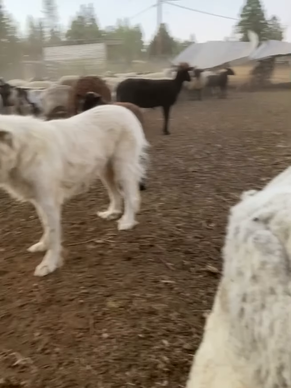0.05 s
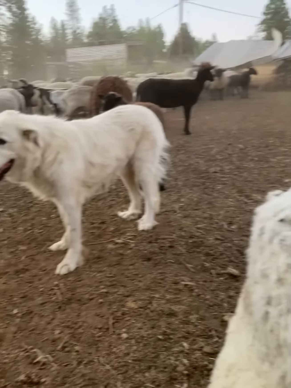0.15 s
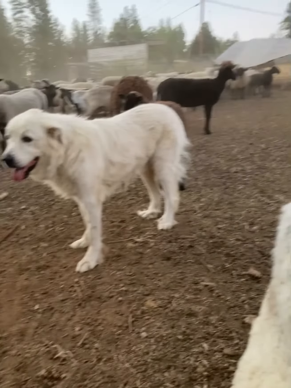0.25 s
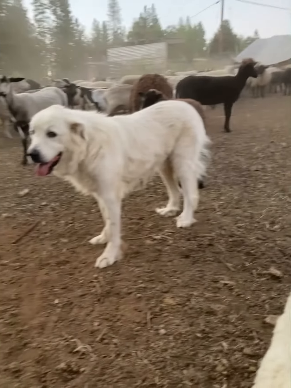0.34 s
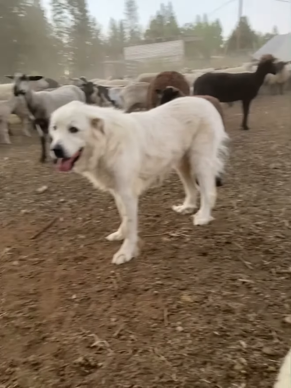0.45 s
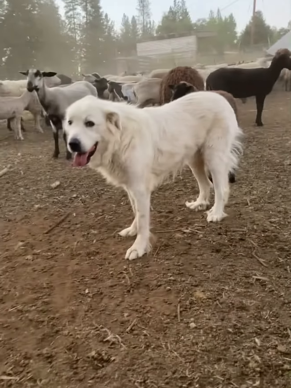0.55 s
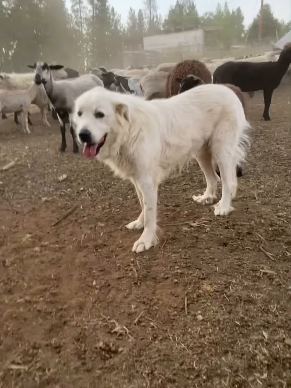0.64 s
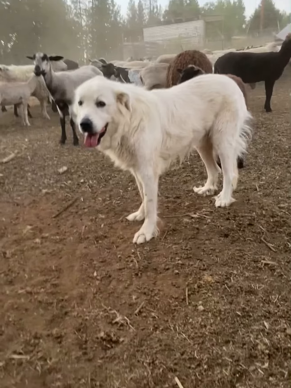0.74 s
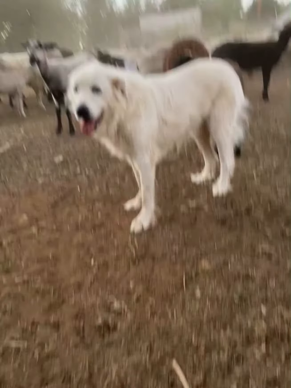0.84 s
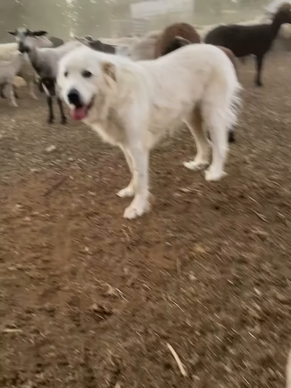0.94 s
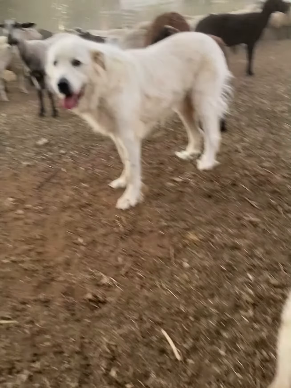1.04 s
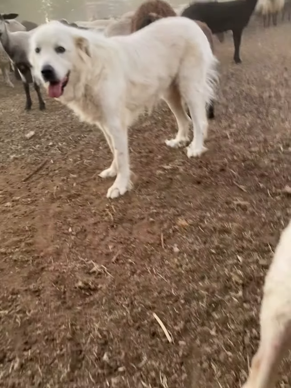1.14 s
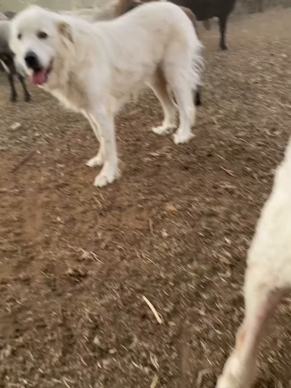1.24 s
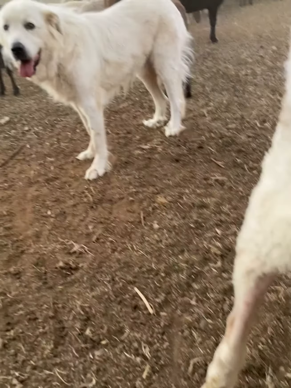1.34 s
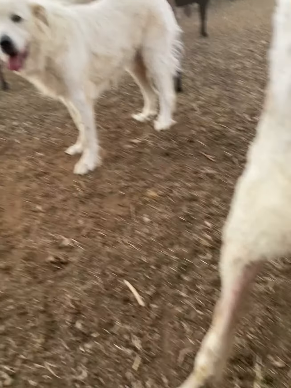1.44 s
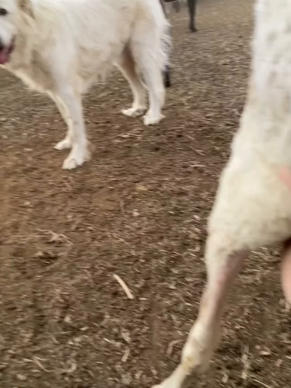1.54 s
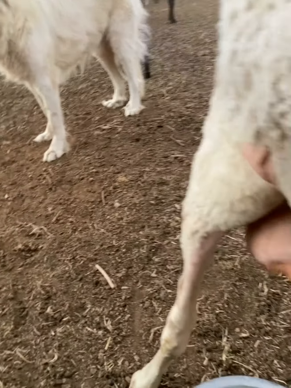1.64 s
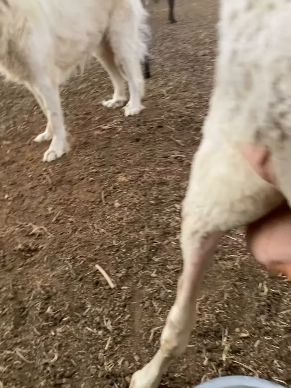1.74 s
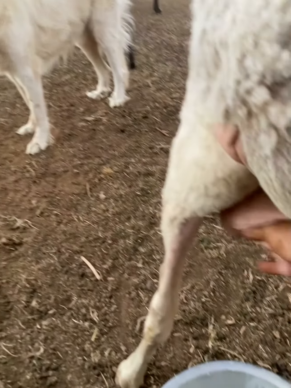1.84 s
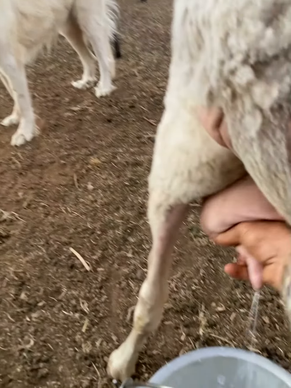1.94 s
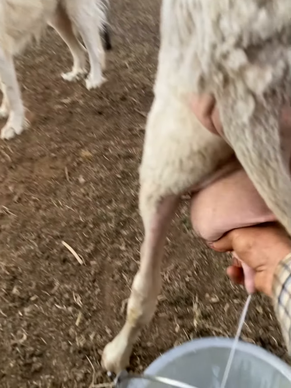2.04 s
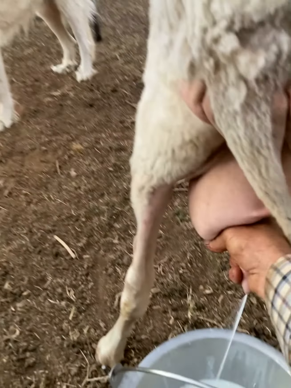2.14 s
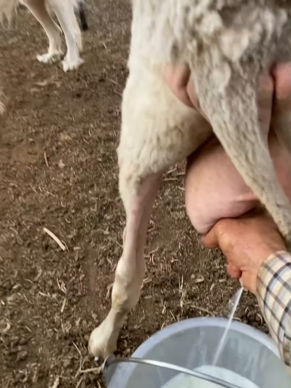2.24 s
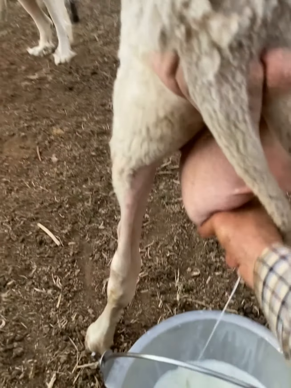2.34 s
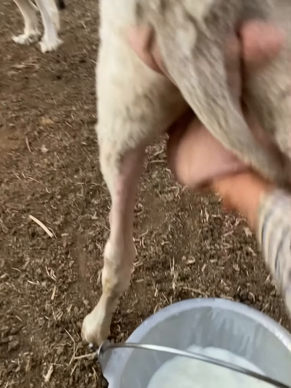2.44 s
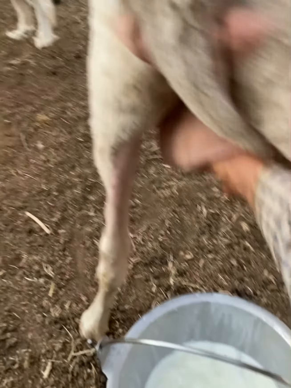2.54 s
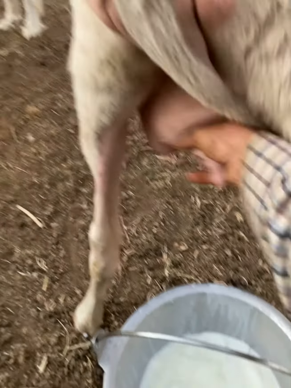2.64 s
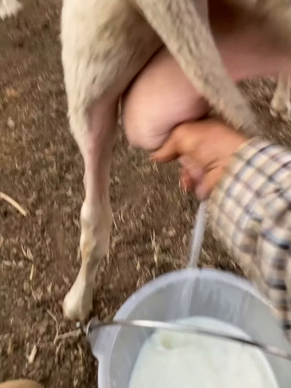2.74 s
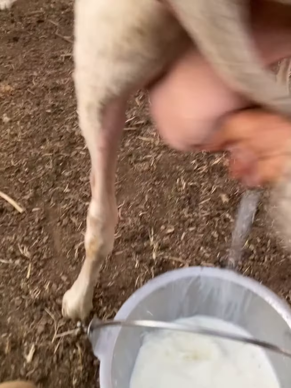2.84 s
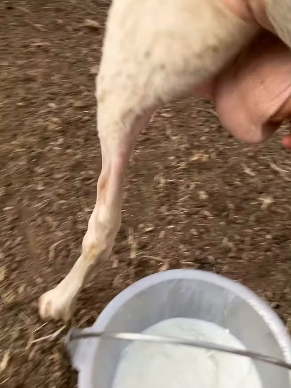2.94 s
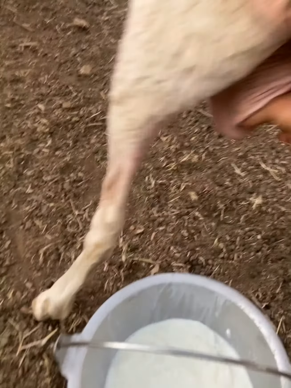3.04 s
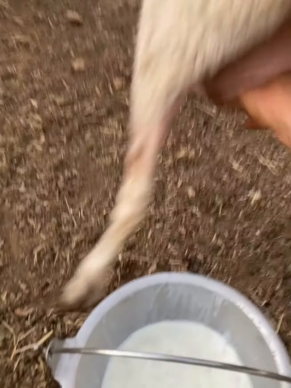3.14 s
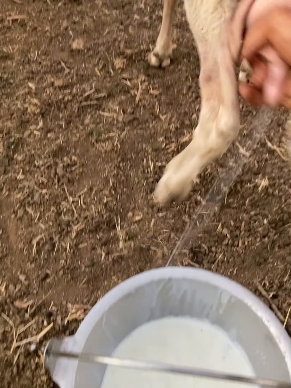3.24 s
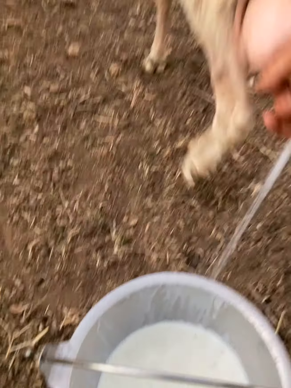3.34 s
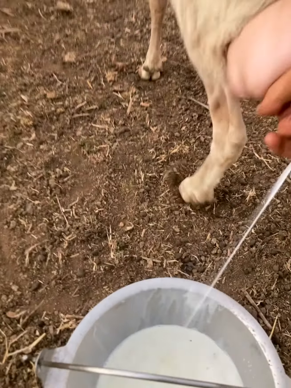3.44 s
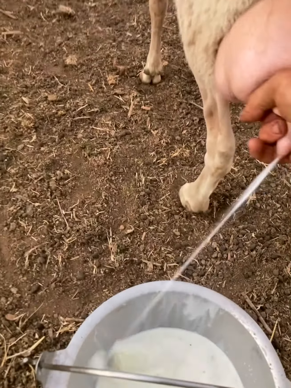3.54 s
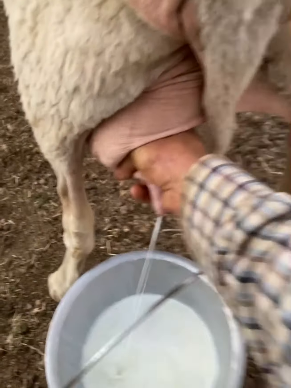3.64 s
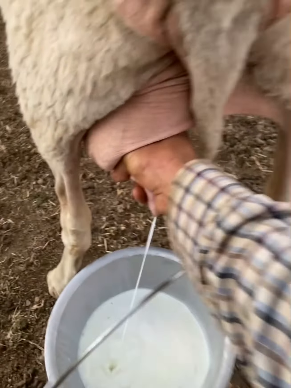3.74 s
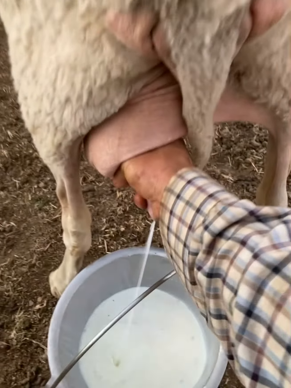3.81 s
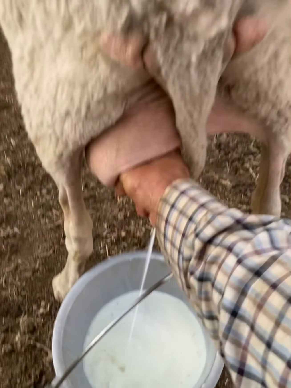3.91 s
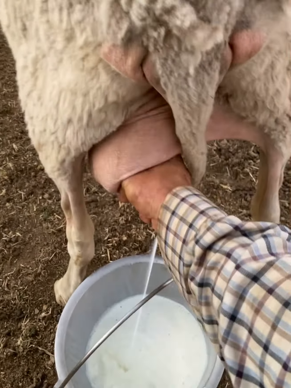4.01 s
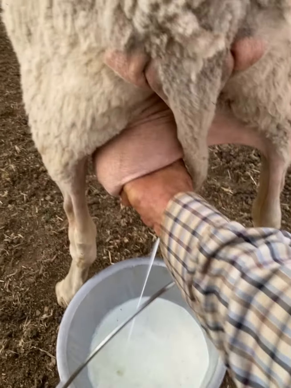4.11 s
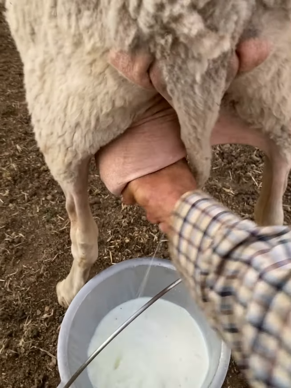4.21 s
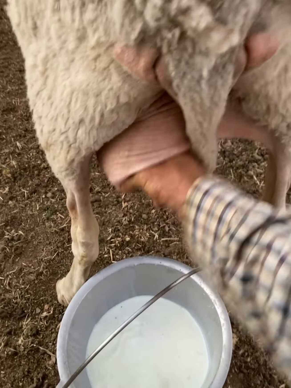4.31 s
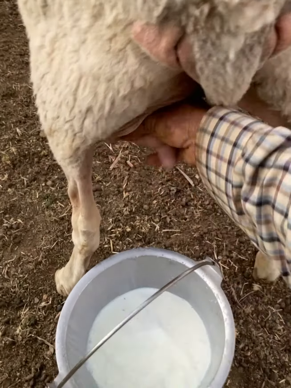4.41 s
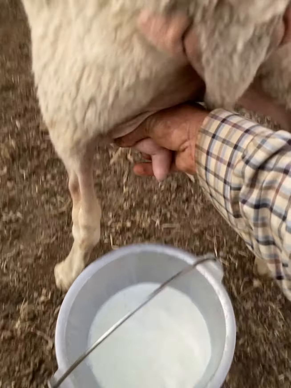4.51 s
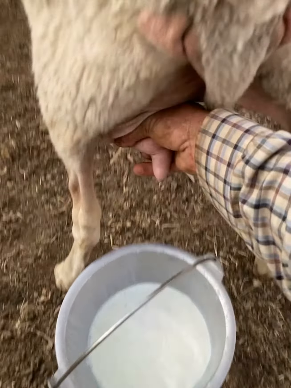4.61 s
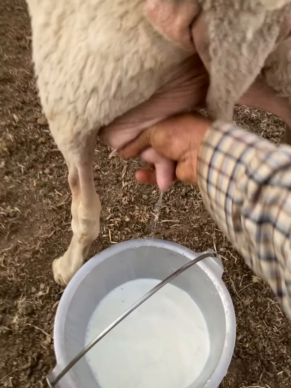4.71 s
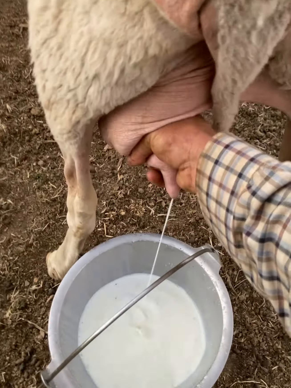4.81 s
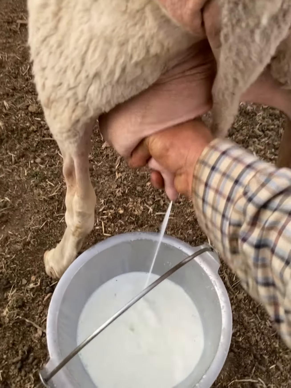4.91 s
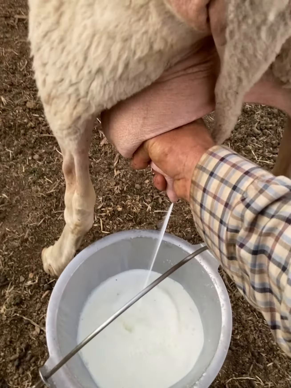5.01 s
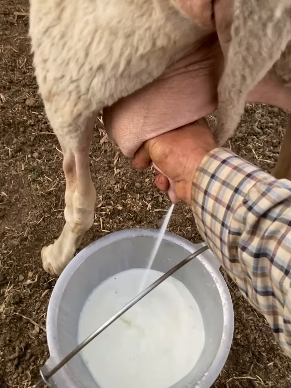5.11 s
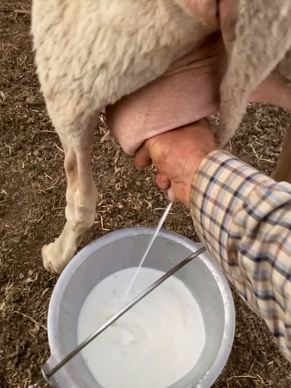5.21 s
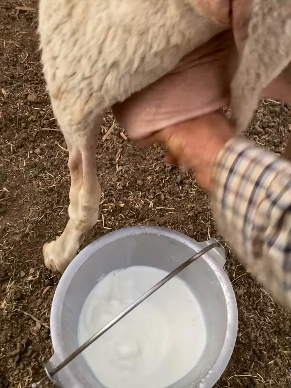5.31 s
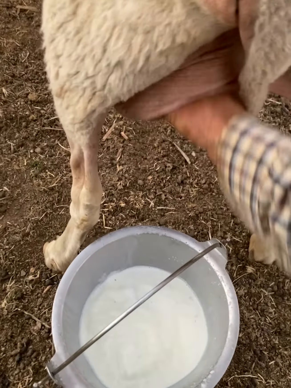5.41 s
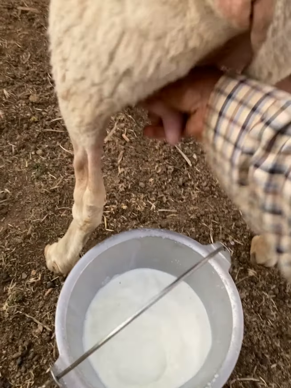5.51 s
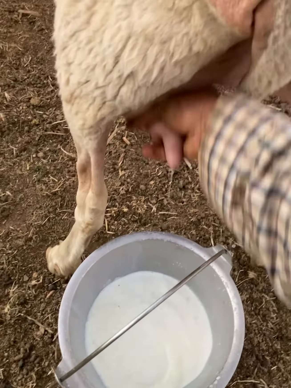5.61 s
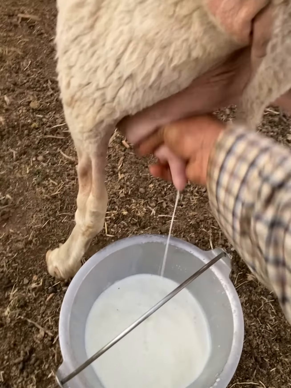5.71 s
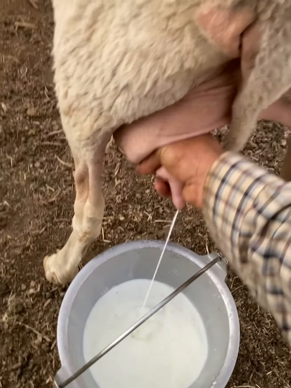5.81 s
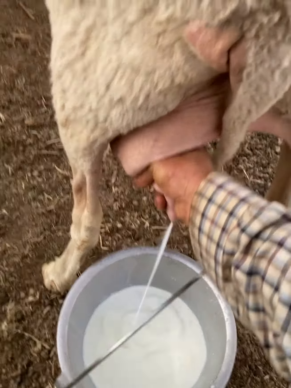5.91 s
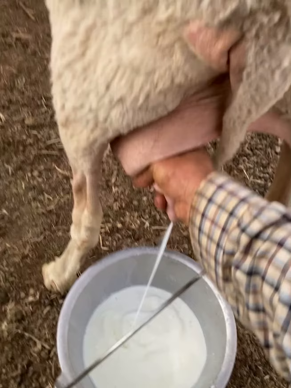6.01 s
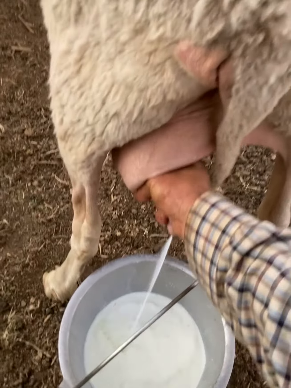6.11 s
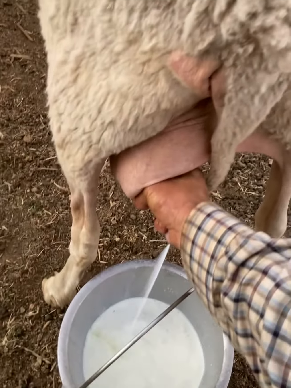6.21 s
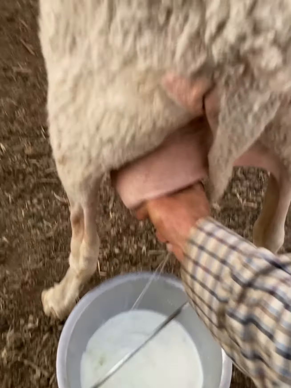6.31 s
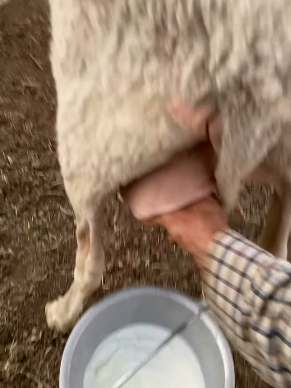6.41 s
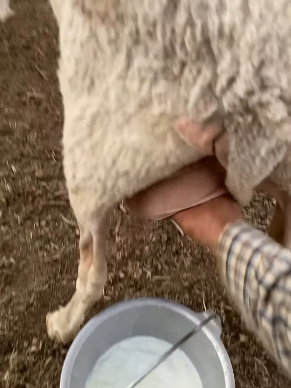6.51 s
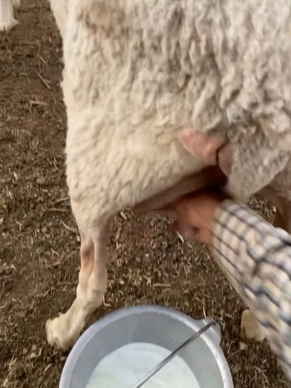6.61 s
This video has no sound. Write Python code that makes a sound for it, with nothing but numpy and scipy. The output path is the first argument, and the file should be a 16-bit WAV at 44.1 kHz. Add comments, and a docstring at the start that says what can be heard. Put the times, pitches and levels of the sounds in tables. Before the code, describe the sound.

Close hand milking: crisp sprays of milk dig into froth and gurgle, quick early on, then longer and slower over faint outdoor rumble.

```python
"""Hand milking into a metal pail

A ewe is milked in a quiet outdoor pen, close to the microphone. Each squirt spatters on the froth, digs
into the milk and gurgles: swarms of tiny bubbles, coloured by the pail's wall echoes and air resonances.
Single plops and sharp drops stand out. Between the early squirts the pail is shifted and knocked, and a
hoof scuffs the dirt: decaying body tones and gritty clicks. Behind lie shaped noise, as low rumble and
fine hiss, and the prickle of settling froth."""
import sys
import numpy as np
from scipy import signal
from scipy.fft import rfft, irfft
from scipy.io import wavfile
from scipy.ndimage import map_coordinates

SR = 44100
rng = np.random.default_rng(int(sys.argv[2]) if len(sys.argv) > 2 else 0)


def to_wav(sig):
    """Store sig (one row per channel, or 1-D mono) as 16-bit WAV at the path in sys.argv[1].

    Samples outside -1..1 are clipped; the rate is SR.
    """
    pcm = np.clip(np.atleast_2d(sig), -1, 1) * 32767
    pcm = np.round(pcm).astype(np.int16)
    wavfile.write(sys.argv[1], SR, pcm.T)  # frames by channels


N = 293706  # length in samples

# Resonances of the air in the pail, lowest first: (frequency [Hz], width [Hz], level [dB])
CAVITY = [(550.5, 48, -2), (705, 260, -1), (1228, 86, 5), (2045, 190, 0), (2880, 750, -8.5),
          (3580, 560, -9.5)]


def squirt(length, attack, bore, crest, release, fizz_db, swell_db, splash_db, gurgle_db, churn_db):
    """One spurt: the jet breaks into uneven slugs that whip up small, middling and large bubbles."""
    tail_s = 0.25
    crest_width = 0.3  # share of the spurt over which the grip is hardest
    t = np.arange(0, length + tail_s, 1 / SR)
    n = len(t)
    after = np.maximum(t - length, 0)

    # the teat opens, the grip swells to its crest, and the flow dies when the hand lets go
    flow = (1 - np.exp(-t / attack)) * gain_of(-60 * after / release)
    slack_db = swell_db * (1 - np.exp(-((t - crest) / (crest_width * length)) ** 2))

    # a weak jet sputters, a full one runs evenly
    weakness_db = slack_db - 20 * np.log10(flow + 1e-9)
    sputter_db = 1.25 * np.clip(0.5 + 0.78 * weakness_db, 1, 2.4)
    sputter = gain_of(sputter_db * wander(n, 320))

    # mid-spurt the jet digs deepest: the gurgle sinks in pitch and the splash brightens
    progress = np.clip((t - bore) / (length + release / 2 - bore), 0, 1)
    depth = np.sin(np.pi * progress ** 1.16) ** 2

    # a harder jet makes finer spray: dB per octave for each dB of fizz above the neutral level
    brighten, neutral_db = 0.1, -35
    fizz_tilt_db = brighten * (fizz_db - slack_db - neutral_db)
    fizz = sputter * swarm(n, 4750, 14840, per_s=15000, spread_db=7.0, cycles=1.2, glide=0.035,
                           tilt_db=fizz_tilt_db)
    splash = sputter * swarm(n, 946, 4520, per_s=2400, spread_db=1.5, cycles=2.18, glide=0.027,
                             tilt_db=1.6 * (depth - 1.56))
    gurgle = swarm(n, 211.0, 808, per_s=700, spread_db=1.0, cycles=2.13, glide=0.0052,
                   tilt_db=6.1 * (0.91 - depth))
    fizz, splash, gurgle = (evened(pail(x)) for x in (near_wall(fizz), splash, gurgle))

    # the hollow caves in and reopens at random; level against the splash
    collapses_per_s, collapse_db = 11, -4.5
    for s in t[rng.random(n) < collapses_per_s / SR]:
        add(splash, s, plunge(collapse_db, count=8))

    # the milk churns on after the jet stops, heard in the pail's lowest resonance
    churn_t60_s = 0.47
    lowest_hz, lowest_width_hz = CAVITY[0][:2]
    churn = evened(ring(gurgle, lowest_hz, lowest_width_hz)) * (1 - flow) * (after > 0)
    churn = churn * gain_of(churn_db - 60 * after / churn_t60_s)

    # the splash builds as the jet nears the milk under the froth
    splash_early = 0.46  # share of the splash heard before that
    splash_lead_s, splash_open_s = 0.0073, 0.015
    reach = opening(t - bore + splash_lead_s, splash_open_s)
    splash = splash * (splash_early + (1 - splash_early) * reach)

    # the gurgle starts once the hollow is open
    gurgle_lag_s, gurgle_open_s = 0.0079, 0.011
    gurgle = gurgle * opening(t - bore - gurgle_lag_s, gurgle_open_s)

    splash_swell = 0.53  # share of the swell that the splash follows
    gurgle_sink_db = 2  # large bubbles are muffled while the jet digs deepest
    jet = fizz * gain_of(fizz_db - slack_db)
    jet = jet + splash * gain_of(splash_db - splash_swell * slack_db)
    jet = jet + gurgle * gain_of(gurgle_db - gurgle_sink_db * depth)
    return flow * jet + churn


def opening(t, rise_s):
    """A soft step from 0 to 1 around t = 0."""
    return 0.5 + 0.5 * np.tanh(t / (2 * rise_s))


def plunge(db, first_hz=3400, last_hz=1150, count=22):
    """As the hollow deepens it traps ever larger bubbles, so the splash falls in pitch."""
    open_s = 0.04  # time for the hollow to open
    n = int(open_s * SR)
    out = np.zeros(n + 2048)
    for k, (late, size, loud) in enumerate(rng.uniform(-0.924, 1, (count, 3))):
        hz = first_hz * (last_hz / first_hz) ** (k / count) * 1.67 ** size
        start = open_s * abs(k + late) / count
        add(out, start, gain_of(0.44 * loud) * bubble(hz, 2.0, 0.03))
    out = pail(out)
    return gain_of(db) * out / out[:n].std()


def swarm(n, low_hz, high_hz, per_s, spread_db, cycles, glide, tilt_db=0, count=40):
    """Bubbles of many sizes, born at random; like sizes cloud together; tilt_db per octave favours small."""
    # weight of the bubbles by pitch: (frequency [Hz], level [dB per Hz])
    spray = [(76, -46), (130, 0), (268, 5.5), (369, 2), (563, 2.5), (1030, -10.5), (1180, -10.5),
             (1700, -6.5), (2080, -8), (2340, -6), (3570, -2.5), (4280, -5), (11700, -6.5), (14600, -4),
             (15800, 24)]
    middle_hz = np.sqrt(low_hz * high_hz)
    out = np.zeros(n)
    for sizes in np.geomspace(low_hz, high_hz, count).reshape(-1, 5):
        octaves = np.log2(sizes.mean() / middle_hz)
        cloud = gain_of(1.94 * wander(n, 70) + tilt_db * octaves)
        for hz in sizes:
            one = bubble(hz, cycles, glide)
            weight = gain_of(read(spray, hz)) * np.sqrt(hz) / np.linalg.norm(one)
            births = cloud * clicks(n, per_s / count, spread_db)
            out += weight * np.convolve(births, one)[:n]
    return out


def bubble(hz, cycles, glide):
    """A bubble swells, peaks after the given cycles and dies away while its pitch drifts."""
    u = np.arange(0, 7, hz / (cycles * SR))  # time, 1 at the peak
    swell = (u * np.exp(1 - u)) ** 2
    return swell * np.sin(2 * np.pi * cycles * (u + glide * u ** 2 / 2))


def pops(rows, cycles, glide, smack_db, spatter_db):
    """Single plops or drops: the smack of the impact, the ring of the trapped air and a brief spatter."""
    out = np.zeros(N)
    t = np.arange(2048) / SR
    for s, db, hz in rows:
        plop = bubble(hz, cycles, glide)
        smack = bubble(min(2.36 * hz, SR / 3), 0.69, 0)
        add(plop, 0, gain_of(smack_db) * smack)
        spatter = clicks(len(t), 1600, 1.2) * np.exp(-t / 0.0021) * (t > 0.001)
        blow = (t == 0) + gain_of(spatter_db) * spatter / np.linalg.norm(spatter)
        sound = pail(signal.fftconvolve(blow, plop))
        add(out, s, gain_of(db) * sound / abs(sound).max())
    return out


def near_wall(x, delay_s=0.000487, sway=0.26):
    """The nearest wall returns the spray at once; as the jet moves, the hollows of that echo slide."""
    delay = SR * delay_s * np.exp(sway * wander(len(x), 6.63))  # in samples
    echo = map_coordinates(x, [np.arange(len(x)) - delay])
    return x + gain_of(-10) * echo


def pail(x, sway_s=0.0498):
    """Sound made inside the pail: wall echoes that shift as the jet sways, and fixed air resonances."""
    treble = signal.sosfilt(signal.butter(2, 1500, "high", fs=SR, output="sos"), x)
    spot = np.arange(len(x)) / (sway_s * SR)
    out = x + sum(gain_of(db) * ring(x, hz, width) for hz, width, db in CAVITY)
    for k in range(4):
        share = np.maximum(np.cos(np.pi / 2 * (spot - k)), 0)
        out = out + signal.fftconvolve(treble * share, walls())[:len(x)]
    return out


def walls():
    """The quick echoes between the pail's walls, for one spot on the milk."""
    t60_s, first_s, echo_db = 0.022, 0.0006, -6.5
    t = np.arange(2048) / SR
    taps = rng.standard_normal(len(t)) * (t > first_s) * gain_of(-60 * t / t60_s)
    return gain_of(echo_db) * taps / np.linalg.norm(taps)


def ring(x, hz, width):
    """A resonance of gain 1: a one-pole filter turning at hz, narrower when it rings longer."""
    r = np.exp(-np.pi * width / SR)
    return 2 * signal.lfilter([1 - r], [1, -r * np.exp(2j * np.pi * hz / SR)], x).real


def handling():
    """The pail rings dully when it is knocked, and judders as grit scrapes under it."""
    # knocks on the pail: (time [s], peak level [dB], level of the grit under its foot [dB])
    knocks = [(1.178, -35, -73), (1.922, -36.5, -53), (2.682, -38.5, -68), (3.008, -26, -35.5)]
    # the pail or a hoof scrapes over dirt:
    # (start [s], length [s], time to the hardest push [s], grit level [dB], judder level [dB])
    scrapes = [(1.641, 0.25, .18, -46, -42.5), (3.11, 0.075, 0.027, -51, -59)]
    # tones of the filled pail when knocked or dragged: (frequency [Hz], level [dB], t60 [s])
    body_tones = [(172.6, 0, 0.066), (219.4, 11.5, 0.036), (290, 2, 0.054)]
    # colour of the grit: (frequency [Hz], level [dB per Hz])
    grit_colour = [(300, -18), (900, -8), (1400, -0.5), (2200, 1), (3200, -5.5), (5000, -3), (9000, -6.5),
                   (16000, -5)]

    out = np.zeros(N)
    t = np.arange(8192) / SR
    body = sum(gain_of(db - 60 * t / t60) * np.sin(2 * np.pi * hz * t) for hz, db, t60 in body_tones)
    body = body * (1 - np.exp(-t / 0.011))
    for s, db, grit_db in knocks:
        add(out, s, gain_of(db) * body / abs(body).max())
        crunch = coloured(rng.standard_normal(len(t)), grit_colour) * np.exp(-((t - 0.006) / 0.0046) ** 2)
        add(out, s - 0.01, gain_of(grit_db) * crunch)  # the grit gives way just before the pail lands

    grit_swell_db, judder_swell_db = 8.5, 20  # the judder needs a harder push than the grit
    for start, length, crest, grit_db, judder_db in scrapes:
        t = np.arange(0, length, 1 / SR)
        slack = np.interp(t, [0, crest, length], [1, 0, 1])
        slips = clicks(len(t), 4100, 1.8)
        grit = gain_of(grit_db - grit_swell_db * slack) * coloured(slips, grit_colour)
        judder = evened(signal.fftconvolve(slips, body)[:len(t)])
        judder = gain_of(judder_db - judder_swell_db * slack) * judder
        add(out, start, (grit + judder) * signal.windows.tukey(len(t), 0.15))
    return out


def yard():
    """Low outdoor rumble, a fine hiss and the faint prickle of froth settling in the pail."""
    # colour of the open air: (frequency [Hz], level [dB per Hz])
    air_colour = [(15, -56), (25, -78), (42, -5), (70, 3.5), (261, -4), (333, -12.5), (449, -12),
                  (1320, -24.5), (1780, -26.5), (1980, -26.5), (2660, -27), (3580, -23.5), (9990, -27.5),
                  (13800, -25), (15800, -19)]
    # course of the open air: (time [s], rumble level [dB], hiss level [dB])
    air_levels = [(0, -58.5, -59.5), (1.05, -54.5, -57), (3.25, -54, -51.5), (4.4, -58, -55),
                  (5.5, -56, -52.5), (6.66, -56.5, -53.5)]
    rumble_db, hiss_db = follow(air_levels, np.arange(N) / SR)
    air = coloured(rng.standard_normal(N), air_colour)
    low = signal.sosfiltfilt(signal.butter(2, 900, fs=SR, output="sos"), air)
    rumble = signal.sosfilt(signal.butter(6, 48, "high", fs=SR, output="sos"), low)
    prickle = swarm(N, 6500, 14960, per_s=180, spread_db=3.5, cycles=0.37, glide=0.0068, count=10)
    prickle = evened(pail(prickle))
    hiss = evened(air - low) * gain_of(0.23 * wander(N, 33))
    hiss = hiss + gain_of(-5) * prickle
    return gain_of(rumble_db) * evened(rumble) + gain_of(hiss_db) * hiss


def clicks(n, per_s, spread_db):
    """Random clicks of either sign; a few are much larger than the rest."""
    size = gain_of(spread_db * np.minimum(rng.exponential(1, n), 4))
    return size * rng.choice([-1, 1], n) * (rng.random(n) < per_s / SR)


def wander(n, per_s):
    """Smooth chance: random values, per_s of them a second, joined by straight lines."""
    return np.interp(np.arange(n) * per_s / SR, np.arange(8192), rng.standard_normal(8192))


def coloured(x, spectrum):
    """x weighted by the given spectrum, at rms 1."""
    gain = gain_of(read(spectrum, np.fft.rfftfreq(len(x), 1 / SR)))
    return evened(irfft(rfft(x) * gain, len(x)))


def gain_of(db):
    """Decibels as an amplitude factor."""
    return 10 ** (np.asarray(db) / 20)


def evened(x):
    """x at rms 1."""
    return x / np.sqrt(np.mean(x ** 2) + 1e-20)


def read(points, hz):
    """The value of a spectrum table at hz, on a logarithmic frequency axis."""
    f, value = np.transpose(points)
    return np.interp(np.log(hz + 1), np.log(f + 1), value)


def follow(rows, t):
    """The columns of a curve table at the times t."""
    s, *columns = np.transpose(rows)
    return [np.interp(t, s, c) for c in columns]


def add(mix, s, sound):
    """Mixes a sound in at the time s; what falls outside is dropped."""
    at = round(s * SR)
    sound = sound[max(-at, 0):]
    part = mix[max(at, 0):][:len(sound)]
    part += sound[:len(part)]


def scene():
    """Milk jets with their splashes, the handled pail and the open air."""
    # one row a spurt, strongest at the crest before it dies away; most bore through the froth, but
    # at 3.386 s the jet sweeps over ground and wall before it meets the milk:
    # (start [s], length [s], attack [s], time to reach the milk [s], time to crest [s], release t60 [s],
    #  fizz at the crest [dB], swell [dB], splash [dB], gurgle [dB], churn afterwards [dB], plunge [dB])
    spurts = [ (-0.35, 0.38, .03, 0.049, 0.49, 0.2, -32, 0.5, -41.5, -40.5, -58, -45),
              (0.47, 0.34, 0.037, 0.075, 0.2, 0.22, -31, 8, -41.5, -40.5, -52.5, -37.5),
              (1.207, 0.36, 0.0058, 0.047, 0.25, 0.19, -31, 7.5, -40.5, -42, -58, -37.5),
              (1.995, .348, 0.0057, 0.036, 0.22, 0.14, -25.5, 12.5, -35, -37, -47, -41),
              (2.688, .21, .006, 0.034, 0.13, 0.14, -25.5, 8.5, -34, -42, -43, -35.5),
              (3.386, .205, 0.094, .135, 0.17, 0.036, -27, 11, -34.5, -39, -56, -43),
              (3.6, 0.53, .012, 0.022, .40, 0.3, -31, 6.5, -39, -39.5, -60, -41.5),
              (4.712, 0.52, 0.038, 0.1, .39, 0.18, -31.5, 5.5, -42, -37.5, -55, -47),
              (5.743, 0.56, 0.02, .08, 0.46, 0.28, -29.5, 6.5, -39.5, -40, -56, -44.5), ]
    # single bubbles and a few faint drips: (time [s], peak level [dB], pitch [Hz])
    plops = [(0.235, -50.5, 1300), (0.539, -26.5, 1290), (0.562, -22, 2840), (1.268, -29, 1170),
             (2.015, -22.5, 1076), (2.334, -23, 3280), (2.445, -47, 1600), (2.667, -35.5, 2700),
             (2.899, -26, 1790), (3.475, -25.5, 2680), (3.531, -20.5, 2880), (3.689, -23.5, 655),
             (4.786, -16.5, 2050), (4.806, -21, 2050), (4.827, -22.5, 665), (4.857, -22.5, 784),
             (4.871, -23.5, 680), (5.206, -25.5, 573), (5.79, -27, 2650), (5.836, -28, 1340),
             (5.906, -25.5, 675), (6.429, -45, 1300)]
    # sharp drops on the froth and the wall: (time [s], peak level [dB], pitch [Hz])
    sharp_drops = [(.6847, -11, 13200), (1.2225, -33, 5100), (1.6036, -12.5, 5140), (2.0033, -17.5, 8300),
                   (2.0145, -10.5, 9600), (2.0238, -11, 6550), (2.0507, -4, 5450), (2.1532, -9, 7660),
                   (2.7001, -8.5, 13300), (2.9008, -11.5, 5870), (3.6418, -17.5, 3460),
                   (4.7807, -20, 11100), (5.782, -10, 12400), (5.788, -17, 4540)]
    # the milk falls silent for an instant: (from [s], to [s])
    silences = [(2.0765, 2.0885), (3.5925, 3.5975)]

    milk = pops(plops, cycles=2.13, glide=0.0046, smack_db=0.5, spatter_db=2.0)
    milk += pops(sharp_drops, cycles=1.7, glide=-0.006, smack_db=-4, spatter_db=-5)
    for start, length, attack, bore, *jet, plunge_db in spurts:
        add(milk, start, squirt(length, attack, bore, *jet))
        add(milk, start + bore, plunge(plunge_db))
    for start, end in silences:
        milk[round(start * SR):round(end * SR)] = 0
    return (milk + handling() + yard())[None]


def record(dry):
    """The recorder's band limit: a steep low-pass that keeps the timing."""
    edge_hz = 16020
    low_pass = signal.firwin(511, edge_hz, window=("kaiser", 8), fs=SR)
    return signal.oaconvolve(dry, low_pass[None], "same")


dry = scene()
out = record(dry)
to_wav(out)
```